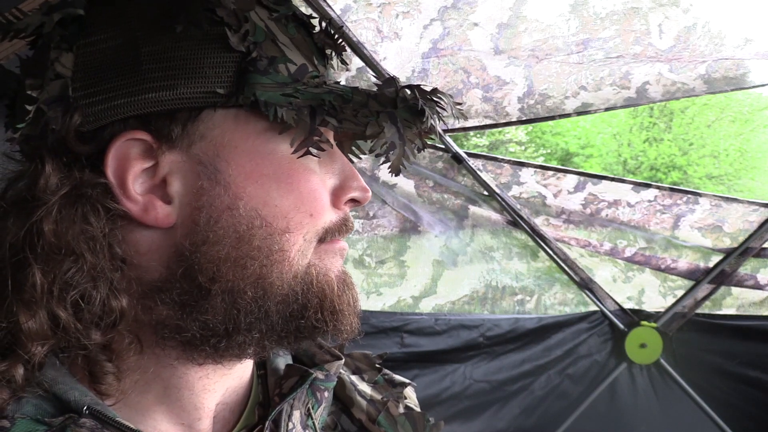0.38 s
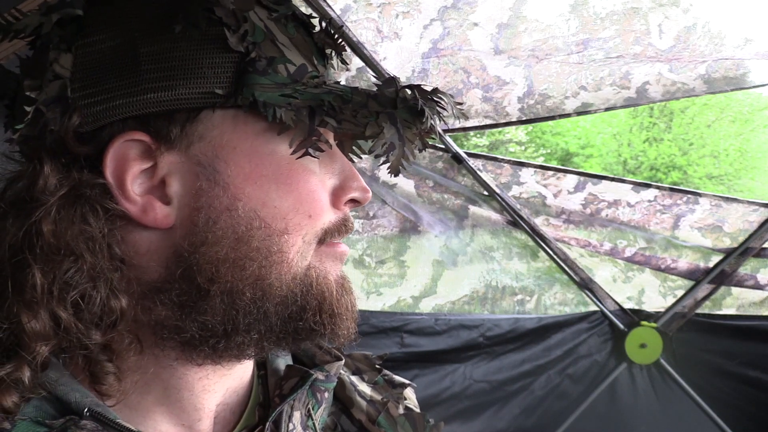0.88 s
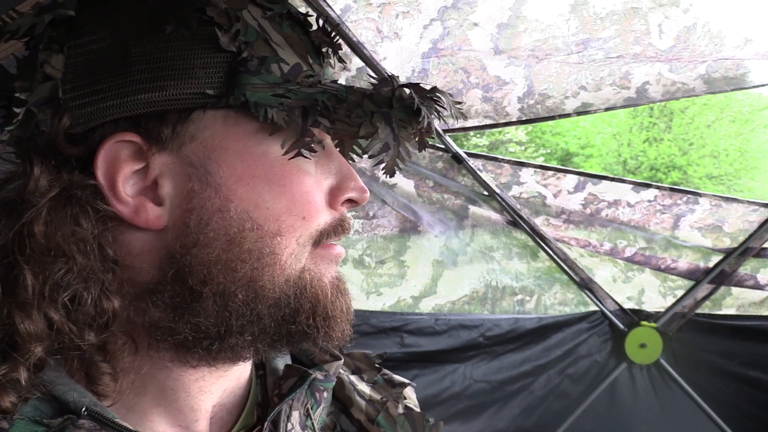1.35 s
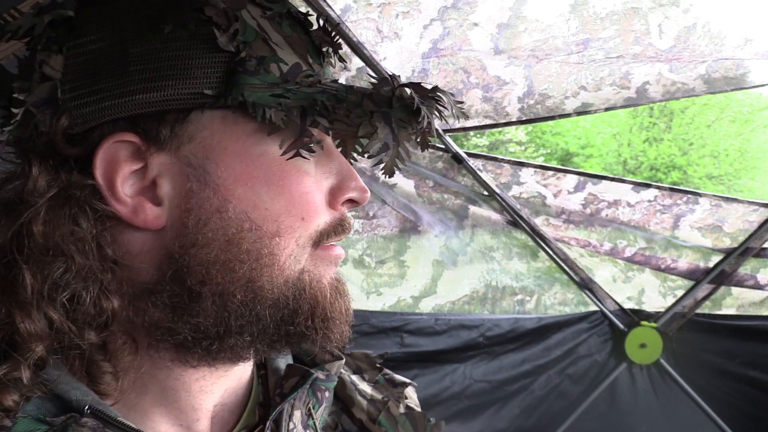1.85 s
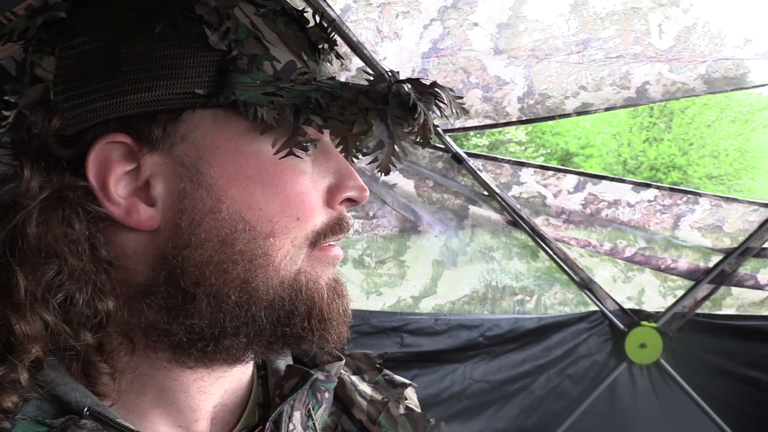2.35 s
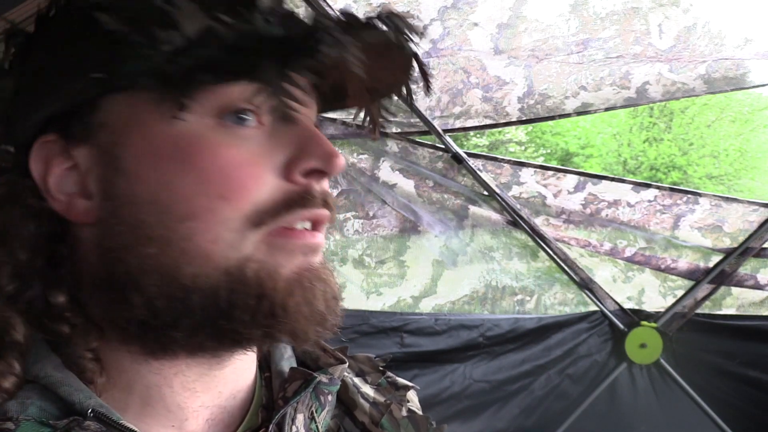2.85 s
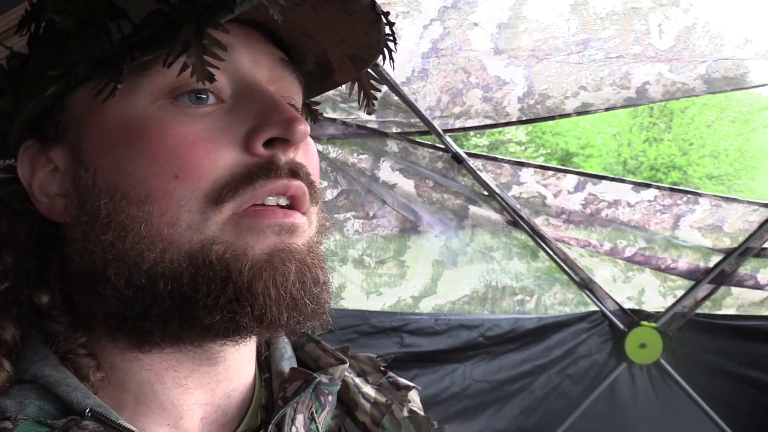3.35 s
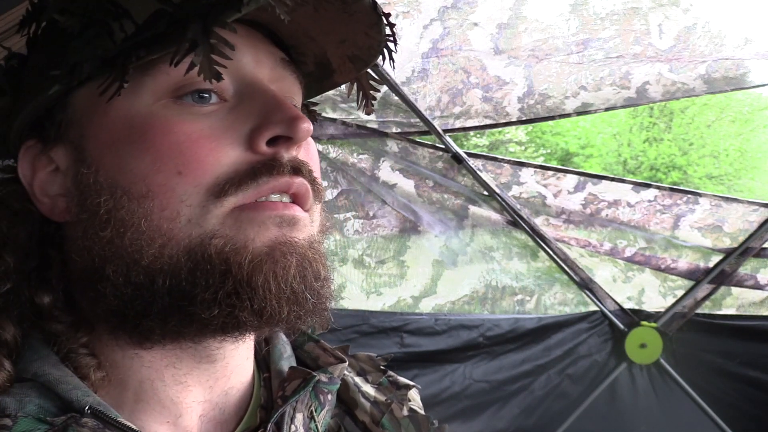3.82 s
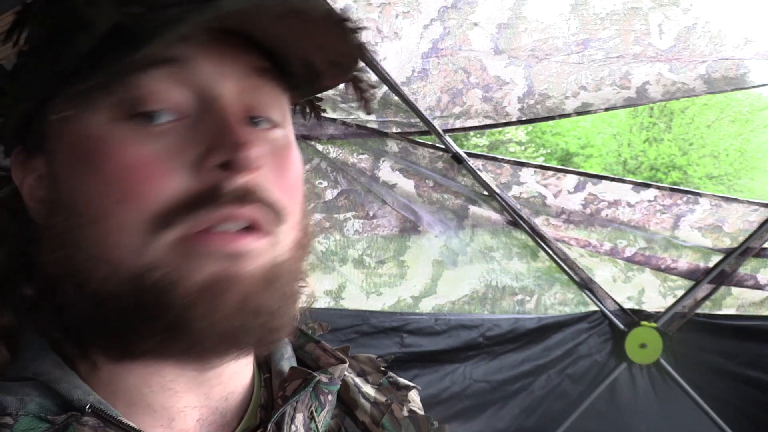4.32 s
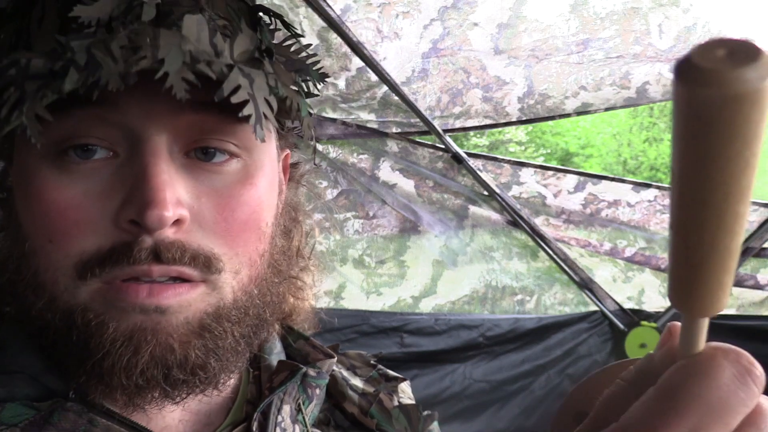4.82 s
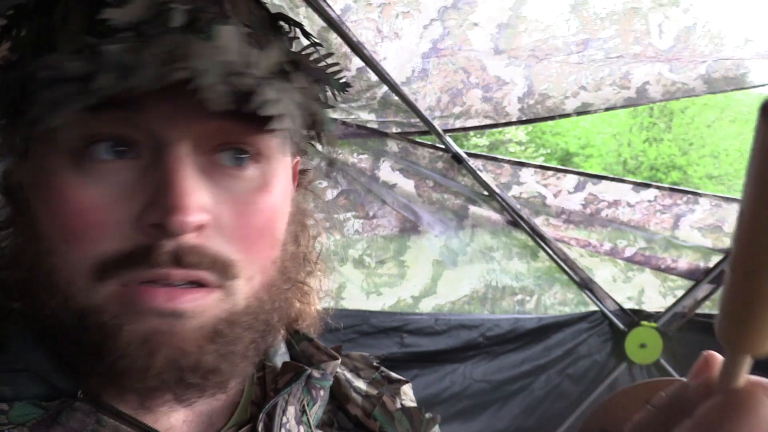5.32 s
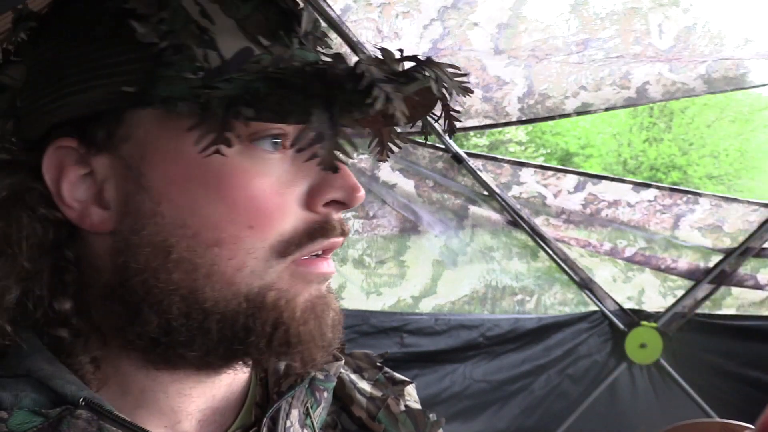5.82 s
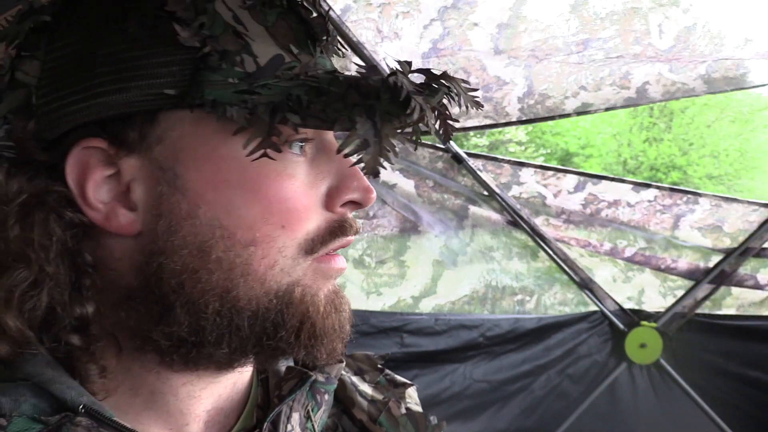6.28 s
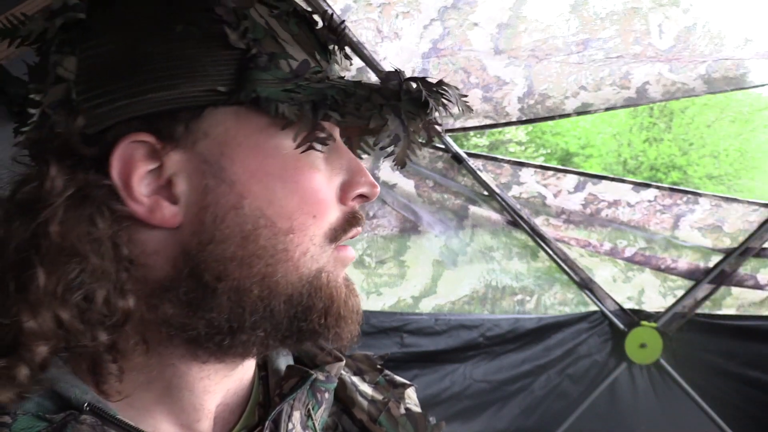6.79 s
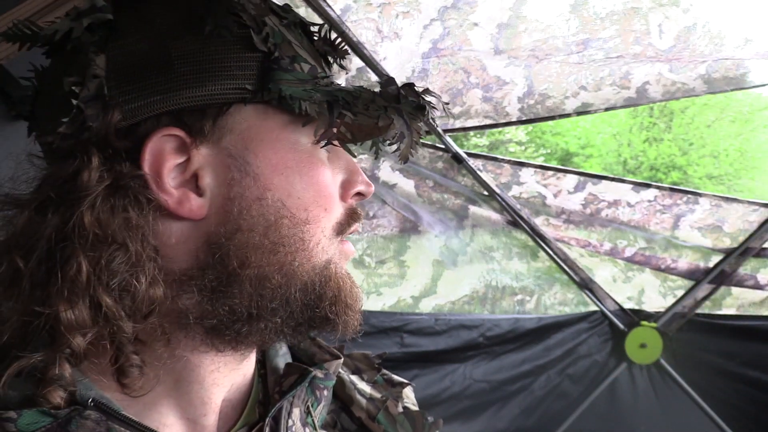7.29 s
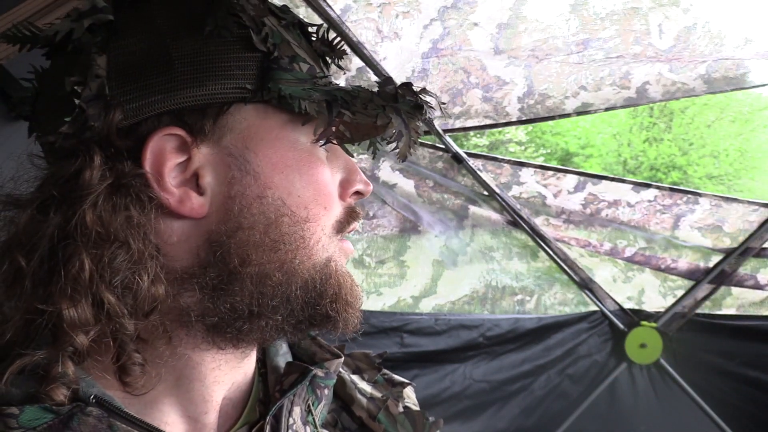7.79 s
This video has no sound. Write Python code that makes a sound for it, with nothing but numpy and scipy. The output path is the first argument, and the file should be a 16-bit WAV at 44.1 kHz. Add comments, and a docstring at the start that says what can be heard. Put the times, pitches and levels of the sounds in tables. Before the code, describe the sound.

A wooden striker draws evenly spaced turkey yelps from slate; a hen answers with quick clucks while rain rumbles low on the fabric.

```python
"""Inside a cloth hunting blind in the woods, a wooden striker dragged over a slate pot call gives eight turkey
yelps, with a faint noise scrape on each return stroke. A hen answers with bursts of short clucks. Both are
trains of partials ringing a set of resonances. Small birds whistle further off as gliding sines, rain rumbles
on the cloth as coloured noise, and the woods send back a long weak echo."""
import sys
import numpy as np
from scipy import signal
from scipy.fft import rfft, irfft, next_fast_len
from scipy.io import wavfile
from scipy.ndimage import uniform_filter1d, minimum_filter1d, map_coordinates

SR = 44100
rng = np.random.default_rng(int(sys.argv[2]) if len(sys.argv) > 2 else 0)


def materialize(psi):
    """Save the field psi as 16-bit PCM at rate SR to the path in sys.argv[1].

    A 1-D psi becomes a single channel; in a 2-D psi each row is a channel.
    """
    bounded = np.clip(np.atleast_2d(psi).T, -1, 1)
    quanta = np.round(bounded * 32767).astype(np.int16)
    wavfile.write(sys.argv[1], SR, quanta)


def magnitude_from_level(level_db):
    """Linear magnitude for a level in decibels (20 dB per decade)."""
    exponent = np.asarray(level_db, float) / 20
    return 10 ** exponent


N = 359415  # samples in the scene


def unit(x):
    """Scaled to rms 1."""
    return x / np.sqrt(np.mean(x ** 2) + 1e-20)


def along(points, hz):
    """(Hz, value) points read on a log frequency axis."""
    point_hz, value = np.transpose(points)
    return np.interp(np.log(hz + 1), np.log(point_hz + 1), value)


def over_time(points):
    """(s, value) points joined by straight lines over the whole scene."""
    return np.interp(np.arange(N) / SR, *np.transpose(points))


def wobble(n, rate):
    """A smooth random curve through `rate` random knots a second."""
    knots = rng.standard_normal(int((n // (SR // 4) + 1) * rate / 4) + 4)
    return map_coordinates(knots, [np.arange(n) * rate / SR])


def filtered(x, response):
    """x with its spectrum multiplied by a response of frequency."""
    size = next_fast_len(N + SR // 2)
    return irfft(rfft(x, size) * response(np.fft.rfftfreq(size, 1 / SR)), size)[:N]


def noise(spectrum):
    """Coloured noise of rms 1."""
    return unit(filtered(rng.standard_normal(N), lambda hz: magnitude_from_level(along(spectrum, hz))))


def stretch(rows):
    """Sample numbers, and the columns read at each sample, of a table that starts with time."""
    s, *columns = np.transpose(rows)
    first, last = max(round(s[0] * SR), 0), min(round(s[-1] * SR), N)
    k = np.arange(first, last)
    return k, [np.interp(k / SR, s, column) for column in columns]


def stack(pitch_hz, rough, spectrum, tilt_db, jitter, smear, count):
    """Partials of a pulse train; roughness shakes its pace and smears each partial, the high ones most."""
    n = len(pitch_hz)
    hz = pitch_hz * (1 + jitter * rough * wobble(n, count // 4))
    phase = 2 * np.pi * np.cumsum(hz) / SR
    partial = np.arange(1, 24)[:, None]
    share = np.clip(smear * rough * partial ** .9 / 1.9, 0, 1)
    # random complex curves, `count` knots a second, take over the smeared share
    blur = np.array([wobble(n, count) + 1j * wobble(n, count) for _ in partial]) / np.sqrt(2)
    carrier = np.sqrt(1 - share ** 2) + share * blur
    octaves = np.log2(np.maximum(partial / 2, 1))  # above the second partial
    audible = partial * hz < SR / 2
    gain = magnitude_from_level(along(spectrum, partial * hz) + tilt_db * octaves) * audible
    return np.sum(gain * np.real(carrier * np.exp(1j * partial * phase)), axis=0)


def ring(x, modes, direct_db):
    """The drive rings a set of resonances and leaks past them."""
    def body(f):
        response = magnitude_from_level(direct_db)
        for centre, width, db in modes:
            response = response + magnitude_from_level(db) * 1j * f * width / (centre ** 2 - f ** 2 + 1j * f * width)
        return response
    return filtered(x, body)


def echo(x, t60, seconds):
    """A diffuse tail of fading noise: each frequency dies at its own speed."""
    hz, t, z = signal.stft(rng.standard_normal(int(seconds * SR)), SR, nperseg=256)
    fading = z * magnitude_from_level(-60 * t / along(t60, hz)[:, None])
    tail = signal.istft(fading, SR, nperseg=256)[1]
    return signal.fftconvolve(x, tail / np.linalg.norm(tail))[:N]


# the eight yelps; level is that of the drive, release_db is added near the end of the stroke:
# start_s, level_db, lowest_second_partial_hz, length_s, release_db
YELP_ROWS = [(0.126, -13, 1350, 0.16, 15.5), (0.451, -13, 1319, 0.17, 1), (0.791, -12.5, 1327, 0.16, 0.6),
             (1.115, -12.5, 1326, 0.16, 3.9), (1.441, -13, 1336, 0.17, 6), (1.775, -12.5, 1287, .16, -2.5),
             (2.104, -10, 1299, 0.16, -6.4), (2.419, -10, 1290, 0.16, -4.5)]
# colour of the return scrape: pitch_hz, level_db (relative, per Hz)
SCRAPE_COLOUR = [(410, -49), (700, -16.5), (893, -21.5), (1070, -20), (1120, -7.5), (1360, -1.5),
                 (2800, -27.5), (4210, -8.5), (5520, -33), (7220, -27.5), (8000, -25), (10100, -36.5),
                 (15000, -40.5)]


def return_scrape():
    """After each yelp the tip slides back with a faint noise; the last time it lifts off."""
    after_s, length_s, rise_s, last_length_s = .125, 0.2, .07, 0.044
    stroke_s = .328  # from one yelp to the next
    top_db, start_db, end_db = -47, -3, -14.5  # both ends are under the top
    level = np.zeros(N)
    one_before = YELP_ROWS[0][0] - stroke_s
    for yelp_s in [one_before] + [row[0] for row in YELP_ROWS]:
        start = yelp_s + after_s
        k, (level_db,) = stretch([(start, start_db), (start + rise_s, 0), (start + length_s, end_db)])
        level[k] = magnitude_from_level(top_db + level_db)
    level[round((start + last_length_s) * SR):] = 0  # start is now that of the last return
    uneven = magnitude_from_level(1.8 * wobble(N, 60))
    return uniform_filter1d(level, size=900) * uneven * noise(SCRAPE_COLOUR)


# one stroke; height runs from lowest pitch (0) to entry pitch (1), further brightness is added later:
# share_of_length, height_0_to_1, level_db, roughness_0_to_1, brightness_db_per_octave
STROKE_SHAPE = [(.03, 1, -30.5, .1, -11), (.085, 0.98, 1.5, 0.2, -7.5), (.16, 0.65, -0.03, 0.6, 2.5),
                (.26, 0.091, 0.5, .3, 0), (.42, 0.04, -10.5, 0.4, 7.5), (.57, 0.0092, -4.5, 0.39, 1.5),
                (.7, .4, -10, 0.7, -9), (.88, .32, -16.5, 0.8, -6.5), (1.01, 0.3, -44, 0.1, -6)]
# partials of one slip: pitch_hz, level_db
SLIP_PARTIALS = [(600, -10.5), (950, 1), (1400, 10), (1850, 2), (2600, -9), (3300, -10), (4100, -8),
                 (4800, -14), (7000, -25), (10000, -32.5), (13000, -42.5), (16000, -43.5)]
# resonances of slate and pot: pitch_hz, width_hz, level_db
POT_MODES = [(670.7, 40, -10), (952, 110, -14), (1355, 200, -4.5), (1628, 38, -4), (1753, 210, -6.5),
             (2005, 57, -16), (2480, 73, -14.5), (3261, 60, -14.5), (4027, 260, -5.5), (4660, 67, -12),
             (6690, 67, -9), (7390, 300, -14.5), (9900, 800, -25)]


def yelps():
    """The tip sticks and slips at half the strong partial, clean at first and gritty as it lifts."""
    entry_hz = 1871  # second partial where every stroke bites
    bright_db, brightens_db_per_s = -1.12, 0.83  # dB per octave; the hand leans harder along the series
    drive = np.zeros(N)
    share, height, shape_db, rough, tilt_db = np.transpose(STROKE_SHAPE)
    for s, db, low_hz, length, release_db in YELP_ROWS:
        pitch = (low_hz + height * (entry_hz - low_hz)) / 2
        level_db = db + shape_db + release_db * (share > .8)
        tilt = tilt_db + bright_db + brightens_db_per_s * s
        rows = np.transpose([s + share * length, pitch, level_db, rough, tilt])
        k, (hz, level_db, grit, tilt) = stretch(rows)
        drive[k] = magnitude_from_level(level_db) * stack(hz, grit, SLIP_PARTIALS, tilt, jitter=0.026, smear=0.4, count=900)
    return magnitude_from_level(6) * ring(drive, POT_MODES, direct_db=-21.5)


# near reflections from cloth walls and ground: delay_s, level_db
WALL_COPIES = [(.004, -28.5), (.0075, -14.5), (0.011, -7.5), (0.019, -19), (.024, -30)]
# dying away inside the blind: pitch_hz, time_to_fall_60_db_s
BLIND_T60 = [(600, 0.081), (2000, 0.089), (8000, 0.0067)]


def walls(x, tail_db):
    """The sound itself, a few near reflections and a short diffuse tail."""
    copies = sum(magnitude_from_level(db) * np.pad(x, (round(s * SR), 0))[:N] for s, db in WALL_COPIES)
    return x + copies + magnitude_from_level(tail_db) * echo(x, BLIND_T60, .3)


# dying away in the woods: pitch_hz, time_to_fall_60_db_s
WOODS_T60 = [(600, 2.2), (1400, 3.2), (2000, 2.2), (4000, 1.1), (10000, .5)]


def woods(slate, answer):
    """Both calls come back as a long weak diffuse echo."""
    return magnitude_from_level(-49.5) * echo(slate, WOODS_T60, 2.5) + magnitude_from_level(-65) * echo(answer, WOODS_T60, 3.0)


# strength of the drumming: time_s, level_db
DRUMMING_LEVEL = [(0, -45), (.5, -46.5), (1.7, -50), (2.1, -44), (2.9, -48), (4, -46), (6.2, -47),
                  (6.8, -55), (8.15, -55)]
# colour of the drumming: pitch_hz, level_db (relative, per Hz)
DRUMMING_COLOUR = [(65, -28), (110, -2), (189, -4), (242, 1.5), (298, -9), (337, -4.5), (426, -11),
                   (482, -17), (800, -26), (1040, -59), (1760, -120)]


def drumming(clumps_db):
    """Drops drum on the cloth: low noise that swells in clumps."""
    return magnitude_from_level(over_time(DRUMMING_LEVEL)) * unit(magnitude_from_level(clumps_db) * noise(DRUMMING_COLOUR))


# strength of the buffeting: time_s, level_db
BUFFETING_LEVEL = [(0, -59.5), (1.799, -53), (2.3, -51), (4.698, -50), (6.2, -52), (8.15, -58.5)]
# colour of the buffeting: pitch_hz, level_db (relative, per Hz)
BUFFETING_COLOUR = [(12, -54), (20, -21.5), (59, 2), (120, -0.5), (160, -29.5), (260, -120)]


def buffeting(clumps_db):
    """Air buffets the walls: very low noise that swells along with the drumming."""
    return magnitude_from_level(over_time(BUFFETING_LEVEL)) * unit(magnitude_from_level(0.93 * clumps_db) * noise(BUFFETING_COLOUR))


# colour of the far hiss: pitch_hz, level_db (relative, per Hz)
HISS_COLOUR = [(290, -34.5), (500, -5), (676, -29), (864, -6), (928, -14), (1220, -11.5), (1540, -18.5),
               (2200, -22.5), (8000, -32.5), (15600, -34.5)]


def hiss():
    """A smooth, steady far hiss."""
    return magnitude_from_level(-65) * noise(HISS_COLOUR)


# heavy drops; level is that before the soft onset: start_s, level_db, pitch_hz
THUD_ROWS = [(1.351, -23, 235), (2.23, -24.5, 210), (3.265, -22, 110), (3.742, -20, 127),
             (4.199, -22, 120.5), (4.404, -40, 220), (5.505, -26, 232.3), (5.811, -26, 67.1)]


def thuds():
    """Each heavy drop is a low sine with a soft onset that dies within a few hundredths of a second."""
    out, t = np.zeros(N), np.arange(SR // 10) / SR
    onset = 1 - np.exp(-t / 0.0046)
    for s, db, hz in THUD_ROWS:
        decay = magnitude_from_level(db - 60 * t / 0.037)
        out[round(s * SR):][:len(t)] += decay * onset * np.sin(2 * np.pi * hz * t)
    return out


def rain():
    """Drumming and buffeting share their clumps; thuds and hiss go on top."""
    clumps_db = 1.6 * wobble(N, 5) + 2.8 * wobble(N, 22)
    return drumming(clumps_db) + buffeting(clumps_db) + thuds() + hiss()


# colour of the far birds: pitch_hz, level_db (relative, per Hz)
HAZE_COLOUR = [(1800, -40), (2600, -4), (3400, 2), (4700, -3.5), (6000, -14), (9000, -21), (11000, -50.5)]
# strength of the far birds: time_s, level_db
HAZE_LEVEL = [(2.899, -85), (3.3, -80), (3.9, -80.5), (4.5, -71), (5.502, -71.5), (6.5, -80.5), (7.2, -81),
              (8.15, -81)]


def song_haze():
    """Far birds blurred into a swelling band of noise."""
    return magnitude_from_level(over_time(HAZE_LEVEL) + 1.7 * wobble(N, 12)) * noise(HAZE_COLOUR)


# arched whistles: top_s, top_hz, rise_s, fall_s, level_db
ARCH_ROWS = [(3.079, 4980, .14, 0.023, -51.5), (3.259, 5620, 0.046, 0.013, -50),
             (3.313, 5700, 0.016, 0.022, -50.5), (4.262, 5110, 0.031, .075, -66),
             (4.54, 4900, 0.016, .07, -61.5), (4.797, 5115, 0.053, .08, -64),
             (5.345, 5120, 0.063, 0.063, -62.5)]
# straight whistles: start_s, length_s, first_hz, last_hz, level_db
SLUR_ROWS = [(2.824, 0.04, 3535, 3460, -68), (3.162, 0.025, 3600, 3750, -68),
             (3.59, 0.036, 3500, 4350, -69.5), (4.134, .04, 4900, 4450, -69), (4.25, .04, 3490, 3400, -68),
             (4.44, 0.035, 3300, 4280, -68), (4.461, 0.028, 4300, 4330, -58),
             (4.594, 0.05, 5730, 5880, -69), (4.672, .05, 4950, 4280, -58.5),
             (4.987, 0.043, 4210, 4290, -58), (5.073, 0.015, 5200, 4800, -61.5),
             (6.39, .04, 3700, 3300, -70), (6.453, .04, 2600, 2250, -65.5), (8.076, 0.078, 4140, 3300, -67)]


def whistles():
    """Gliding sines, arched or straight, that flutter in level and waver in pitch."""
    foot_db, arch_end_db, slur_edge_db = -13.5, -2, -3.5  # ends of an arch, both ends of a slur
    drop, bend = .33, 1.6  # pitch lost at both ends (share of the top), roundness of the top
    u = np.linspace(-1, 1, 17)  # from one end of a whistle to the other
    tracks = []
    for s, top_hz, rise, fall, db in ARCH_ROWS:
        time = s + u * np.where(u < 0, rise, fall)
        pitch = top_hz * (1 - drop * abs(u) ** bend)
        level_db = db + np.where(u < 0, foot_db * abs(u), arch_end_db * u * u)
        tracks.append(np.transpose([time, pitch, level_db]))
    for s, length, first_hz, last_hz, db in SLUR_ROWS:
        done = (u + 1) / 2
        pitch = first_hz + (last_hz - first_hz) * done
        tracks.append(np.transpose([s + length * done, pitch, db + slur_edge_db * u * u]))
    out = np.zeros(N)
    for rows in tracks:
        k, (hz, db) = stretch(rows)
        flutter = signal.windows.tukey(len(k), .15) * magnitude_from_level(2.5 * wobble(len(k), 150))
        hz = hz * (1 + .018 * wobble(len(k), 300))
        out[k] += magnitude_from_level(db) * flutter * np.sin(2 * np.pi * np.cumsum(hz) / SR)
    return out


# dying away around the birds: pitch_hz, time_to_fall_60_db_s
TRUNKS_T60 = [(2500, .6), (4500, .4), (6000, 0.25)]


def birds():
    """Whistles doubled by one near trunk, over the haze of far song, all with a tail from the trees."""
    calls = whistles()
    doubled = magnitude_from_level(-4) * np.pad(calls, (round(.012 * SR), 0))[:N]
    song = song_haze() + calls + doubled
    return song + magnitude_from_level(-10) * echo(song, TRUNKS_T60, 1)


# faint dry ticks; level is that before the filter: start_s, level_db
TICK_ROWS = [(3.645, -50), (4.562, -52), (4.645, -50)]


def ticks():
    """Tiny cracks of noise, over in a few milliseconds, with bass and top treble softened."""
    out, t = np.zeros(N), np.arange(SR // 50) / SR
    for s, db in TICK_ROWS:
        out[round(s * SR):][:len(t)] += magnitude_from_level(db - 60 * t / .012) * rng.standard_normal(len(t))
    return filtered(out, lambda hz: hz / (hz + 1500) / (1 + (hz / 7000) ** 2))


# the clucks; level is that of the drive, late_push_db raises the end against the start:
# start_s, level_db, lowest_second_partial_hz, length_s, late_push_db
CLUCK_ROWS = [(3.7568, -26.5, 1270, 0.037, 1), (3.8111, -20, 1333, 0.037, 3.5),
              (3.9165, -20.5, 1398, 0.0404, 13.5), (3.9676, -14.5, 1333, 0.042, 3),
              (4.018, -14.5, 1295, 0.0312, -0.5), (4.9445, -9, 1355, 0.0323, 1.5),
              (5.0834, -9.5, 1362, 0.033, -5), (5.1443, -6, 1360, 0.03, -0.4),
              (5.1937, -7.5, 1348, 0.027, -1.5), (5.2376, -11, 1347, 0.03, -5.5),
              (5.281, -19.5, 1227, 0.022, -1.5), (5.8766, -15.5, 1355, 0.035, 1),
              (5.932, -13.5, 1325, 0.033, 3.5), (6.0044, -8, 1372, 0.034, 0.5),
              (6.0568, -4, 1359, 0.0361, -5.5), (6.1039, -8, 1320, 0.03, 4), (6.1498, -7, 1277, 0.024, 4.5),
              (6.203, -25, 1342, 0.019, 4), (7.506, -13.5, 1350, 0.041, -1.9), (7.672, -9, 1379, 0.039, -4),
              (7.7437, -3.5, 1397, 0.031, -2.4), (7.7968, -5.5, 1349, 0.0356, -2.5),
              (7.8452, -13, 1264, 0.0231, 0)]
# one cluck; height is above the lowest pitch, further brightness is added later:
# share_of_length, height (relative), level_db, roughness_0_to_1, brightness_db_per_octave
CLUCK_SHAPE = [(0.05, 1.3, -35.5, .2, -6), (.13, 1, -10, .2, 0.5), (0.269, .03, -8, 0.3, 1.7),
               (0.47, 0.086, 0, .3, 0.35), (.66, .6, -6.5, .4, 0), (0.92, 1.5, -5.5, 0.6, -5.5),
               (1.039, 2.8, -34, .55, -7.5)]
# thin whines before a cluck; level is that at the end: start_s, end_s, second_partial_hz, level_db
WHINE_ROWS = [(7.483, 7.514, 1560, -44), (7.722, 7.744, 1565, -23.5)]
# partials of the hen: pitch_hz, level_db
HEN_PARTIALS = [(600, -12), (950, 1.5), (1400, 12), (2100, -4.5), (2800, -18.5), (3400, -19), (4100, -15.5),
                (5000, -33.5), (5900, -38.5), (7200, -33.5), (10000, -45.5), (16000, -57)]
# resonances of throat and path: pitch_hz, width_hz, level_db
THROAT_MODES = [(823, 150, -11.5), (1401, 110, -6), (1610, 1200, -14.5), (1639, 130, -1.5),
                (1980, 25, -16.5), (4110, 400, -3), (4800, 600, -6.5), (6600, 250, -14.5)]


def hen():
    """Each cluck drops onto its lowest pitch and slides up again; louder ones are brighter."""
    slide_hz_per_s = 4500  # longer clucks slide further up
    drive = np.zeros(N)
    share, height, shape_db, rough, tilt_db = np.transpose(CLUCK_SHAPE)
    for s, db, low_hz, length, push_db in CLUCK_ROWS:
        pitch = (low_hz + height * slide_hz_per_s * length) / 2
        level_db = db + shape_db + push_db * (share - .5)
        tilt = tilt_db + 0.24 * (db + 10.5)
        rows = np.transpose([s + share * length, pitch, level_db, rough, tilt])
        k, (hz, level_db, rasp, tilt) = stretch(rows)
        drive[k] += magnitude_from_level(level_db) * stack(hz, rasp, HEN_PARTIALS, tilt, jitter=.025, smear=.38, count=900)
    for start, end, hz, db in WHINE_ROWS:
        k, (pitch, level_db) = stretch([(start, hz / 2, db - 16.5), (end, hz / 2, db)])
        drive[k] += magnitude_from_level(level_db) * stack(pitch, .2, HEN_PARTIALS, -11, jitter=0.024, smear=.5, count=900)
    return ring(drive, THROAT_MODES, direct_db=-16.5)


def scene():
    """Near calls in the blind, with the woods, birds, ticks and rain around them."""
    slate = return_scrape() + yelps()
    answer = hen()
    near = walls(slate, tail_db=-16) + walls(answer, tail_db=-17)
    return (near + woods(slate, answer) + rain() + birds() + ticks())[None]


def roll_off(x):
    """The treble ends steeply here."""
    return signal.sosfilt(signal.butter(12, 15720, fs=SR, output="sos"), x)


def record(dry):
    """Gain control eases the level down under loud calls, a limiter holds the peaks, the treble stops short."""
    top_hz, ceiling = 15730, .8
    level_db = 10 * np.log10(np.abs(uniform_filter1d(dry ** 2, size=3000, axis=1)) + 1e-12)
    eased = dry * magnitude_from_level(-.1 * np.maximum(level_db + 46.0, 0))  # 0.1 dB down for each dB above -46
    needed = np.minimum(1, ceiling / (np.abs(eased) + 1e-9))
    held = uniform_filter1d(minimum_filter1d(needed, size=400, axis=1), size=200, axis=1)
    mix = filtered(eased[0] * held[0], lambda hz: hz < top_hz)[None]
    return roll_off(mix)


dry = scene()
out = record(dry)
materialize(out)
```